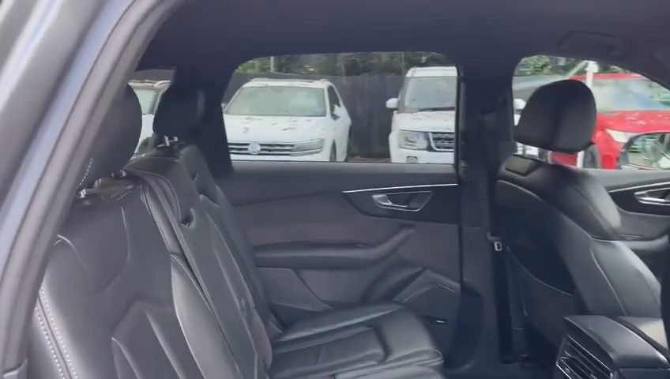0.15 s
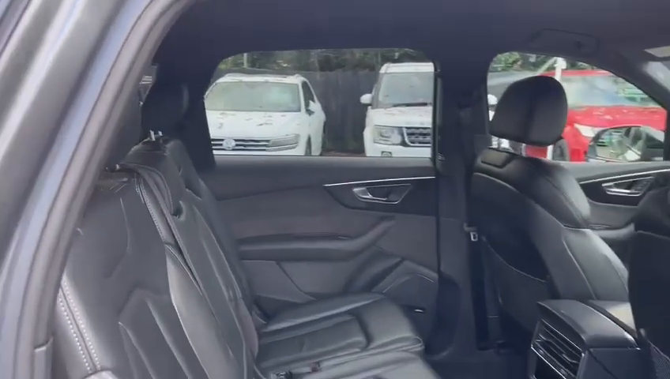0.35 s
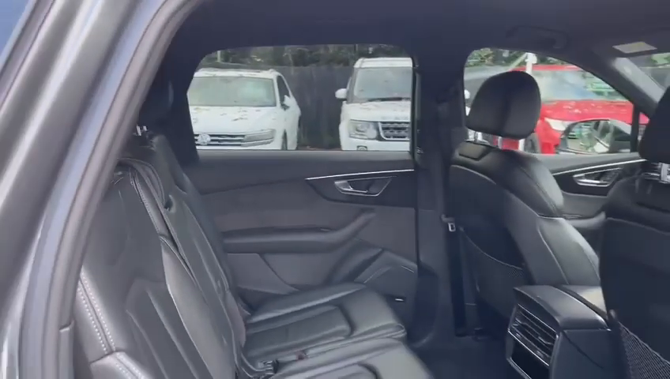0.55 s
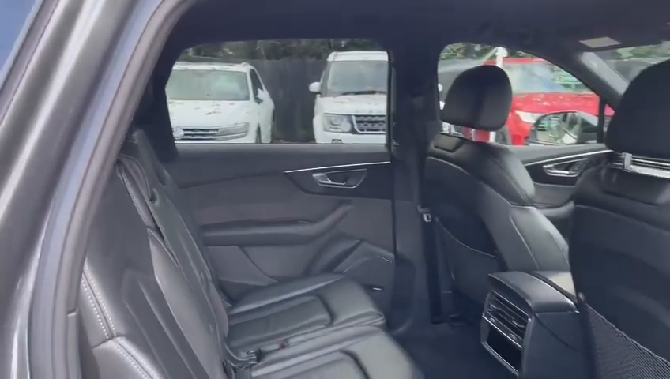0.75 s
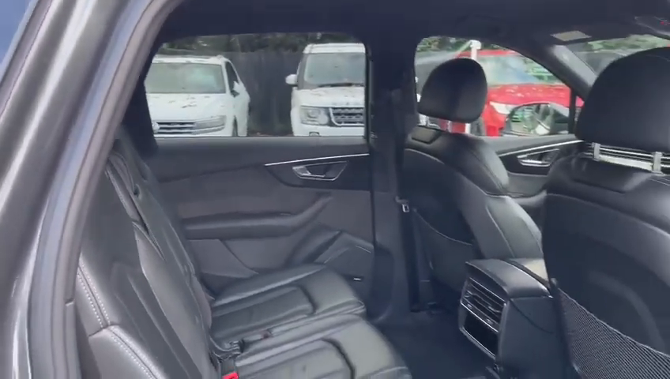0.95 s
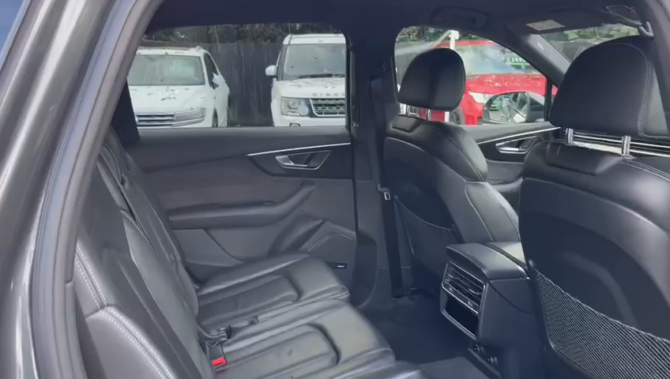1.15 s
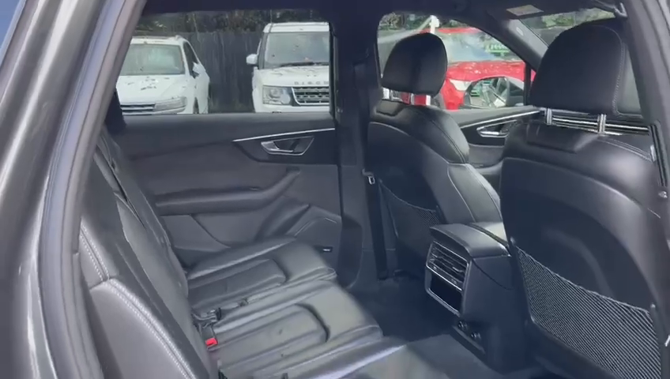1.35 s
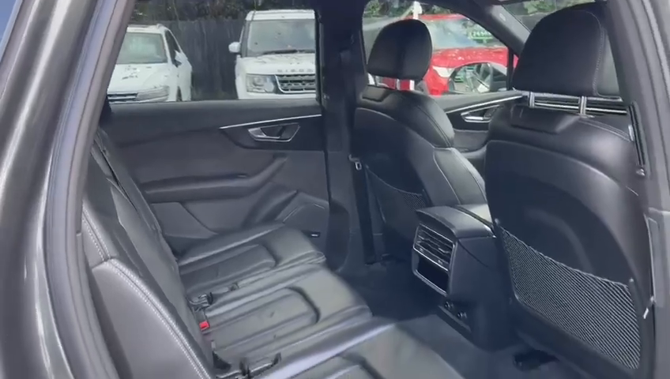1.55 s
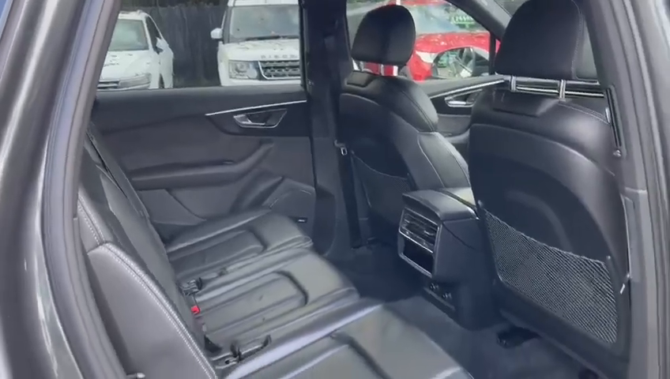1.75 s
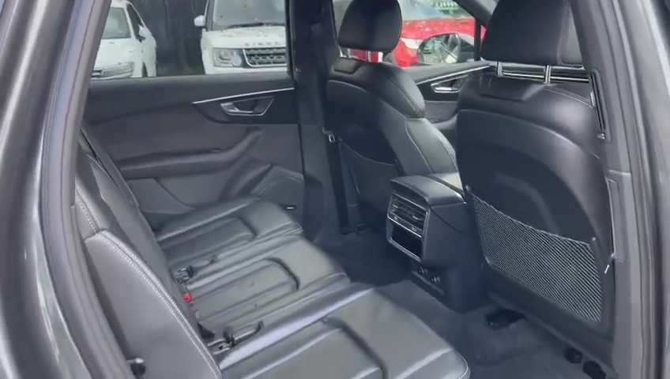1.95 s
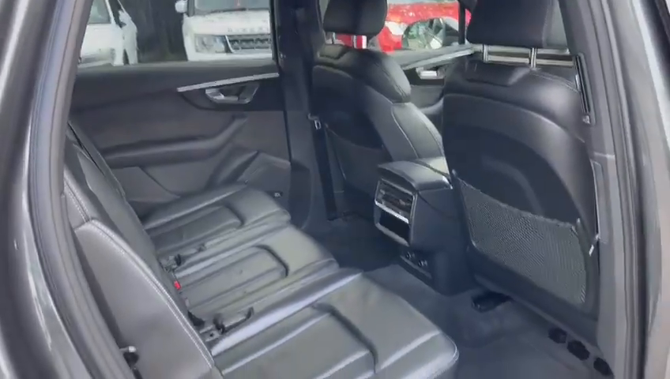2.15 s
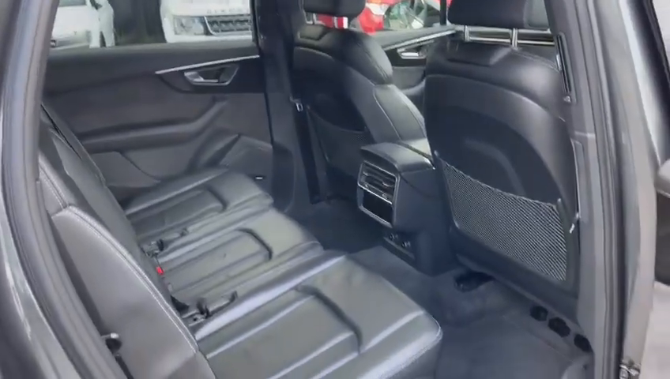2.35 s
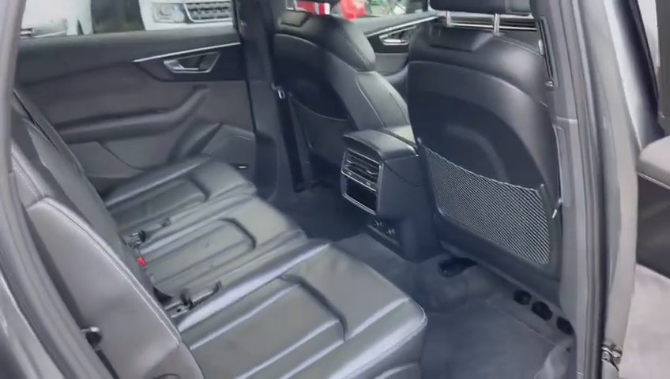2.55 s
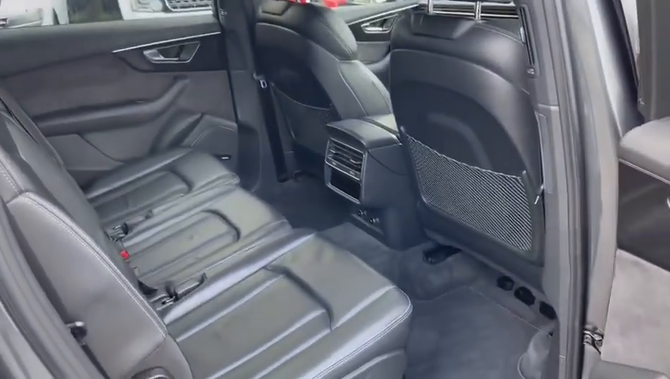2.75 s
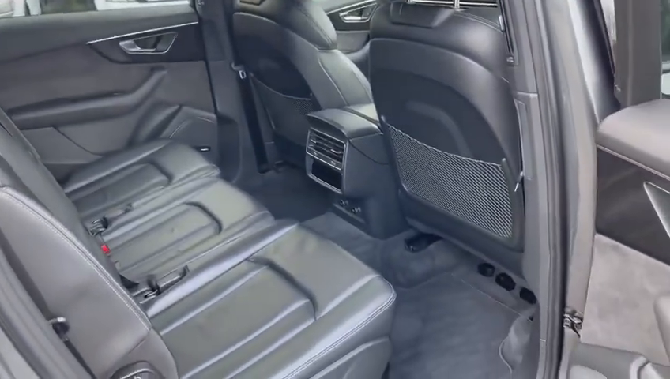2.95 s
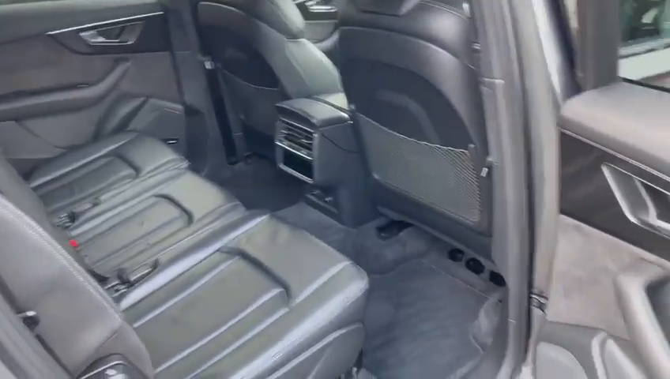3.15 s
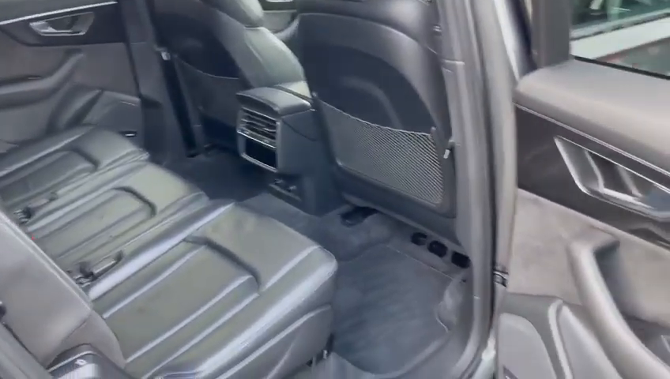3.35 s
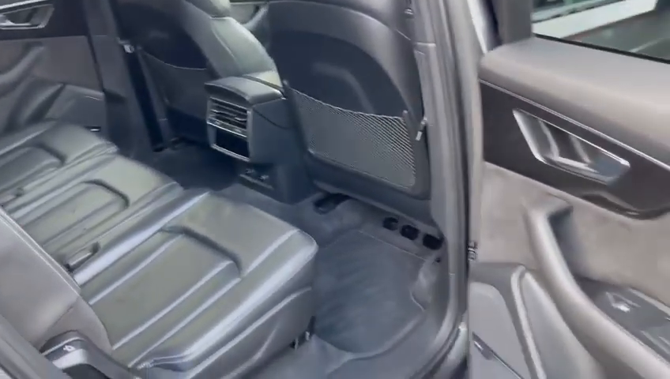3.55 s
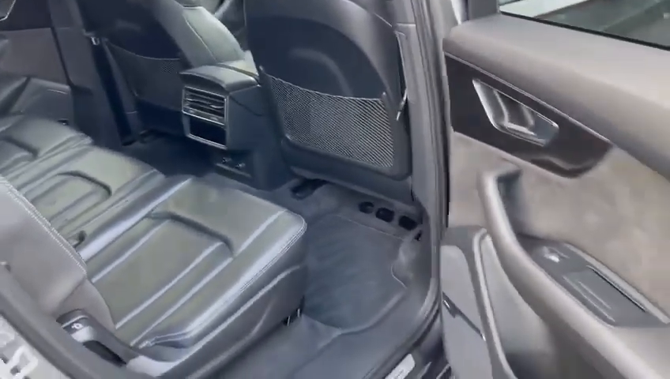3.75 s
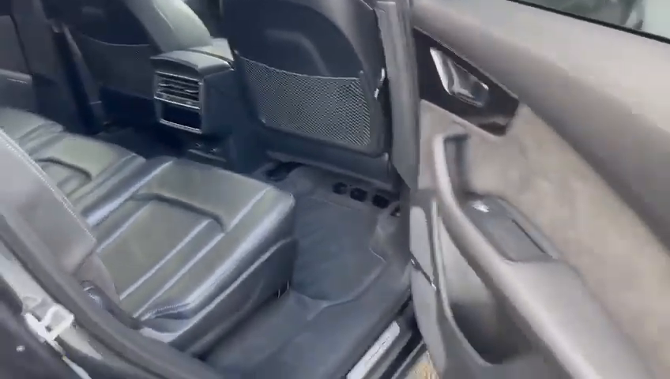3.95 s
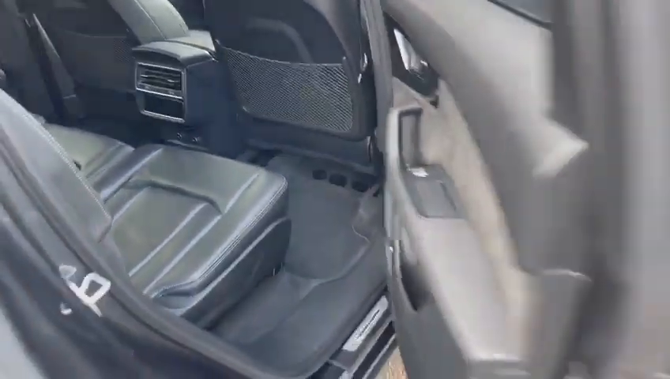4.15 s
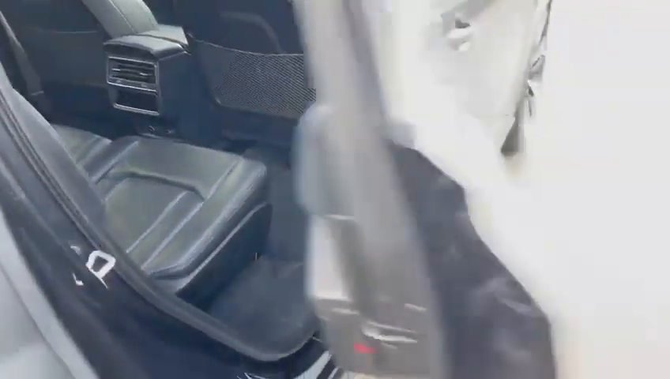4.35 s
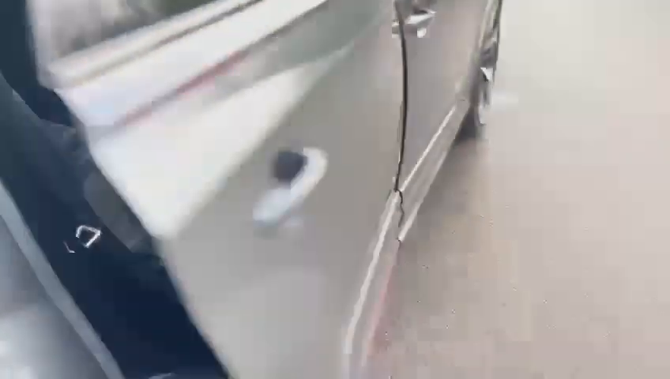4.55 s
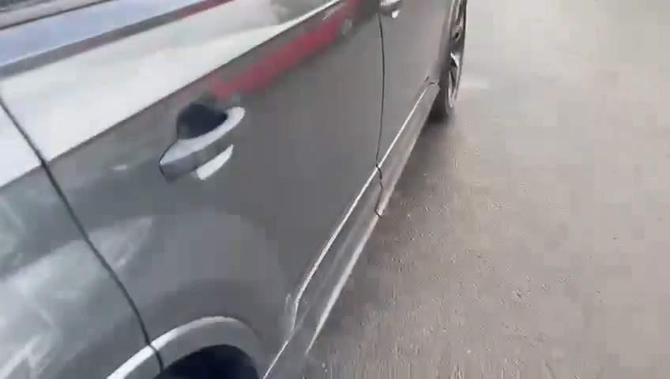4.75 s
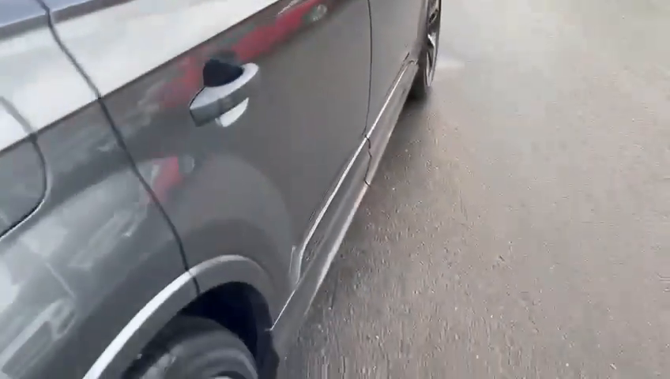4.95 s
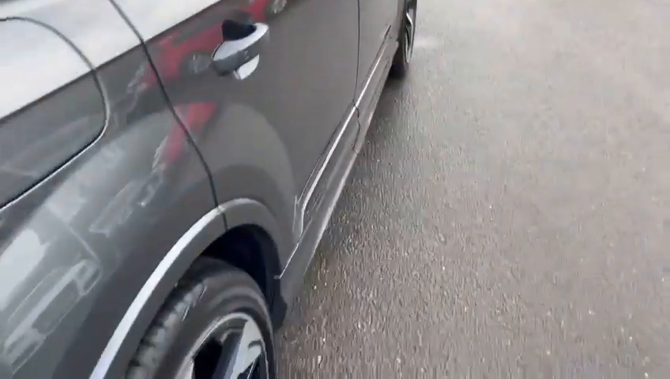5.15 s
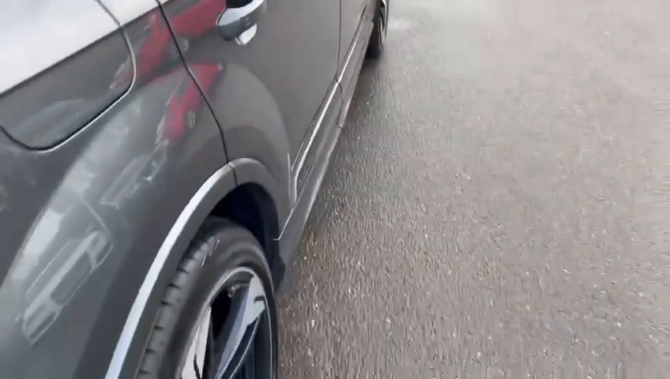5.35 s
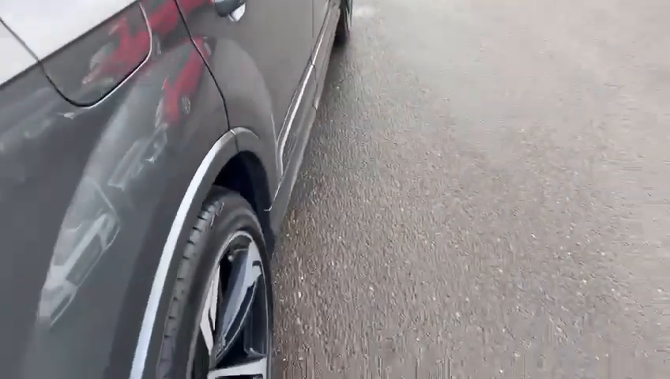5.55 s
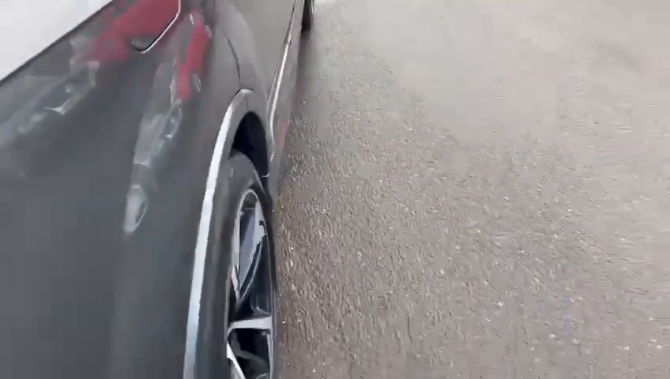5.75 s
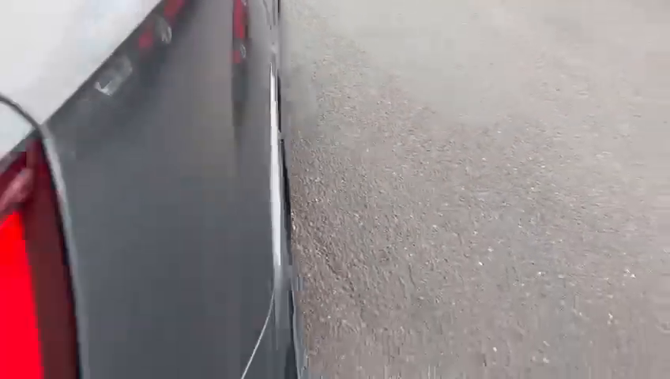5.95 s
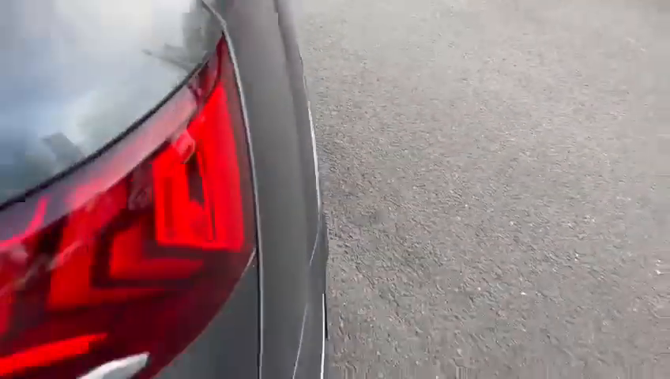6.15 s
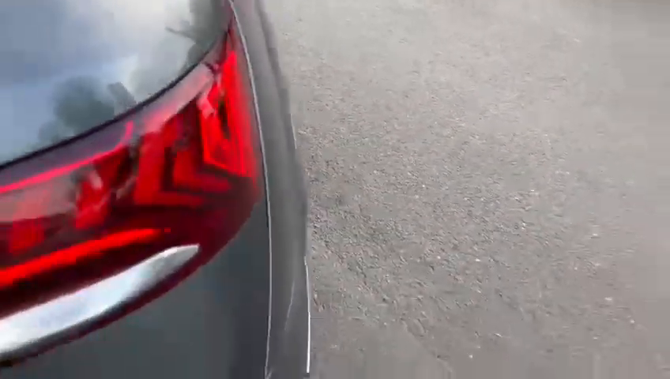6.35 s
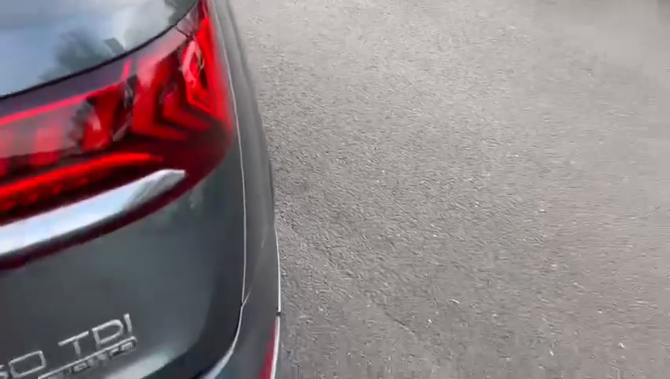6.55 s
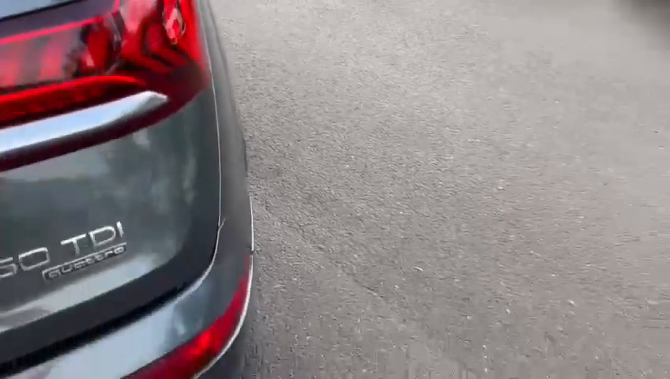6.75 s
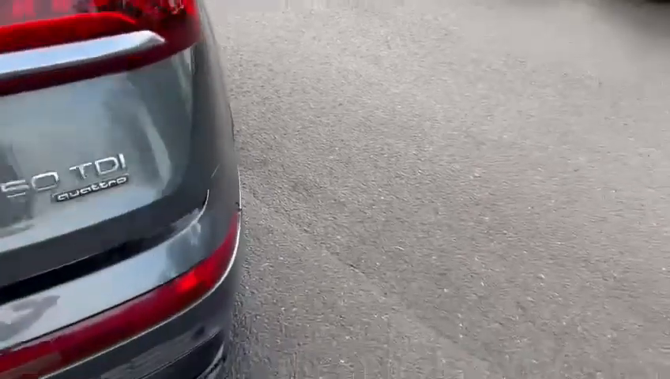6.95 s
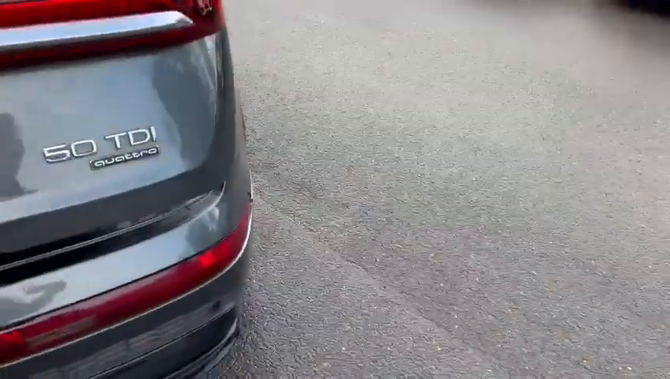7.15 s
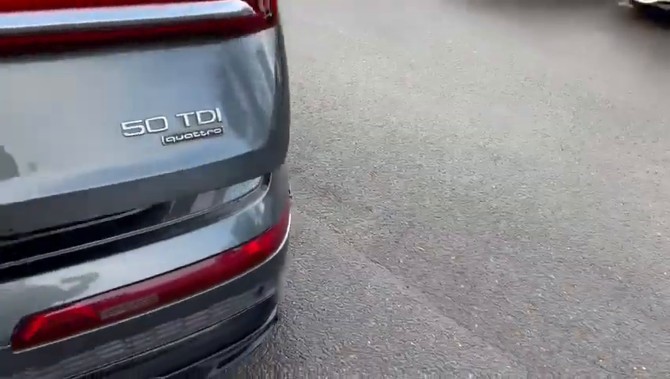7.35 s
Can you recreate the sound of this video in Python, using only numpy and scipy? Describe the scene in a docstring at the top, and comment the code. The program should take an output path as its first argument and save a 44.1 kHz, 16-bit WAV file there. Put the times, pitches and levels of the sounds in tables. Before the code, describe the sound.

A close handheld stereo microphone in the open air among parked cars. Quiet traffic drone and cloth rustle come first, with a passing vehicle and a thin, squeaky whine. Past the middle, a car door shuts with a sharp latch crack and a deep boom, answered by very short reflections from nearby cars. Brushes and clicks lead to a weaker, harder thud, then small irregular knocks over the traffic.

```python
"""Car door slam beside a road

Far traffic rumbles, drones and roars as shaped noise; a vehicle passes, and a faint high squeal rings out.
Close by, clothes rustle as grainy noise and small parts tick and knock as short bursts and rings.
A heavy car door slams, then a second, brighter thud falls further left: blows push banks of ringing modes,
panels and trim rattle through both, and neighbouring cars send back short echoes."""
import sys
import numpy as np
from scipy import signal
from scipy.fft import rfft, irfft, next_fast_len
from scipy.io import wavfile

SR = 44100
rng = np.random.default_rng(int(sys.argv[2]) if len(sys.argv) > 2 else 0)


def dump(signal):
    """Clip the signal to [-1, 1] and save it as 16-bit WAV at the path in sys.argv[1]."""
    limited = np.clip(np.atleast_2d(signal).T, -1, 1)
    pcm = np.round(limited * 32767).astype(np.int16)
    wavfile.write(sys.argv[1], SR, pcm)


N = 327118   # length in samples


def from_db(db):
    """Turns dB into an amplitude factor."""
    return 10 ** (np.asarray(db) / 20)


def rms_one(x):
    """Scales a sound to rms 1."""
    return x / np.sqrt(np.mean(x ** 2) + 1e-20)


def in_time(rows):
    """Draws straight lines between timed rows, one curve for each column after the time."""
    seconds, *columns = np.transpose(rows)
    return [np.interp(np.arange(N) / SR, seconds, column) for column in columns]


def at_hz(points, hz):
    """Reads a curve of (Hz, value) points on a logarithmic frequency axis."""
    point_hz, values = np.array(points).T
    return np.interp(np.log(hz), np.log(point_hz), values)


def drift(rate_hz):
    """Slow random wander of spread 1: noise through two equal low-pass poles at rate_hz."""
    step = 40   # samples between the points of the wander
    pole = np.exp(-2 * np.pi * rate_hz * step / SR)
    noise = rng.standard_normal(N // step + 2002)
    slow = signal.lfilter([1], [1, -2 * pole, pole * pole], noise)[2000:]   # settled part only
    return np.interp(np.arange(N) / step, np.arange(len(slow)), rms_one(slow))


def band(sound, low_hz, high_hz, order=2):
    """Keeps a band of frequencies."""
    edges = [low_hz, high_hz]
    return signal.sosfilt(signal.butter(order, edges, "band", fs=SR, output="sos"), sound)


def ring(push, hz, t60):
    """A damped resonance: a unit click sets a sine of height 1 ringing, 60 dB down after t60 seconds."""
    pole, turn = from_db(-60 / (t60 * SR)), 2 * np.pi * hz / SR
    # the tiny offset keeps the filter clear of very slow, vanishing numbers
    return signal.lfilter([0, np.sin(turn)], [1, -2 * pole * np.cos(turn), pole * pole], push + 1e-18)


# How alike left and right are in the open air. Each row: frequency in Hz, likeness from 0 to 1.
LEFT_RIGHT_LIKENESS = [(60, 1), (160, 0.92), (450, 0.38), (1220, 0.07), (3340, 0.36), (9110, 0.65)]


def coloured(spectrum, source, length=N):
    """Shapes two noises to a spectrum and mixes them to the open-air left-right likeness; rms 1."""
    size = next_fast_len(length)
    hz = np.maximum(np.fft.rfftfreq(size, 1 / SR), 10)
    low_hz, high_hz = spectrum[0][0], spectrum[-1][0]
    gain = from_db(at_hz(spectrum, hz))
    gain = gain * np.minimum(hz / low_hz, 1) ** 4 * np.minimum(high_hz / hz, 1) ** 4   # steep outer slopes
    alike = np.clip(at_hz(LEFT_RIGHT_LIKENESS, hz), 0, .995)
    mid, side = rfft(source, size)
    stereo = np.sqrt(1 + alike) * mid + np.sqrt(1 - alike) * side * [[1], [-1]]
    return rms_one(irfft(gain * stereo, size)[:, :length])


# Spectra of the far rumble, the drone and the tyre roar. Each row: frequency in Hz, density in dB per Hz.
RUMBLE_SPECTRUM = [(20, -52), (39, -11), (59, 1.5), (96, -8), (200, -21.5), (260, -67)]
DRONE_SPECTRUM = [(65, -44), (110, 1), (232, -2), (351, -5.5), (397, -8.5), (508, -5.5), (673, -6.5),
                  (900, -5.5), (1170, -15), (1980, -120)]
TYRE_SPECTRUM = [(290, -8), (500, -9), (759, -7.5), (827, -2.5), (1100, -2), (2130, -14), (3610, -26),
                 (9400, -32.5)]
# Traffic layers: rumble, drone, tyre roar. Each row: far level in dB before its swell, level of the passing
# vehicle at its nearest in dB before random swelling, spread of the random swell in dB.
TRAFFIC_LAYERS = [(-40, -54, -0.5), (-55.5, -38, 1.5), (-53, -45.5, 1.36)]
# Swelling and sinking of the far traffic. Each row: time in seconds, rumble in dB, drone and tyres in dB.
FAR_SWELL = [(0, -5.5, -0.7), (1.1, -2, 5), (2.5, -3, 5.5), (2.8, 0.5, 6), (3.55, -3, 2.5), (4.7, -1, 6),
             (5.2, -1.8, 3.5), (6.4, -3.5, -1), (6.86, -2, 5.5), (7.07, -1, -2), (7.13, -17, 1),
             (7.21, -8, -0.5), (7.26, -2, 0.5), (7.42, -1, 1)]
PASS_S, PASS_M, PASS_M_PER_S = 1.847, 7.9, 16.7   # nearest moment, nearest distance, speed
CLEAR_S, CLEAR_OVER_S, SCREEN_DB = 1.45, .03, -5.5   # parked cars screen the vehicle until it comes clear
GROUND_ECHO_S, GROUND_ECHO_DB = 0.003715, -8   # the road surface mirrors the passing vehicle


def traffic():
    """Three smooth noises, far off, swelling and sinking; a passing vehicle fades with distance squared."""
    t = np.arange(N) / SR
    nearness = PASS_M / np.hypot(PASS_M, PASS_M_PER_S * (t - PASS_S))
    screen = from_db(SCREEN_DB * (1 - np.tanh((t - CLEAR_S) / CLEAR_OVER_S)) / 2)
    low_db, mid_db = in_time(FAR_SWELL)
    swells = (low_db, mid_db, mid_db)
    spectra = (RUMBLE_SPECTRUM, DRONE_SPECTRUM, TYRE_SPECTRUM)
    out = 0
    for (far_db, near_db, patchy_db), swell_db, spectrum in zip(TRAFFIC_LAYERS, swells, spectra):
        far = coloured(spectrum, rng.standard_normal((2, N)))
        vehicle = np.roll(far, N // 2, axis=1)   # same noise, shifted by half the scene
        ground_echo = np.roll(vehicle, round(GROUND_ECHO_S * SR), axis=1)
        vehicle = rms_one(vehicle + from_db(GROUND_ECHO_DB) * ground_echo)
        passing = from_db(near_db + 1.4 * drift(7.4)) * nearness ** 2 * screen
        random_swell = from_db(patchy_db * drift(3.84))
        out = out + random_swell * (from_db(far_db + swell_db) * far + passing * vehicle)
    return out


# A faint squeal, sinking in pitch after a first small rise. Each row: time in seconds, level in dB, pitch in Hz.
SQUEAL = [(1.7, -83, 6050), (1.775, -48.5, 6120), (1.86, -73, 6250), (2.06, -59, 6020), (2.22, -75, 5970),
          (2.34, -58, 5960), (2.5, -65.5, 5930), (2.62, -85, 5880)]
UNDER_SHARE, UNDER_DB, UNDER_FROM_S = .835, -7, 1.92   # second band: share of the pitch, level, start


def squeal():
    """A faint squeal, perhaps brakes: two tones blurred by fast random swelling, the lower one joining late."""
    level_db, hz = in_time(SQUEAL)
    phase = 2 * np.pi * np.cumsum(hz) / SR
    joined = np.arange(N) / SR > UNDER_FROM_S
    under = from_db(UNDER_DB) * joined * drift(200) * np.sin(UNDER_SHARE * phase)
    main = (1 + 0.43 * drift(60)) * np.sin(phase + drift(120))
    return from_db(level_db) * (main + under)


def grains(length, hz):
    """Dense, uneven grains in a broad band around hz; rms 1."""
    noise = rng.standard_normal((2, length)) * [[1], [.5]]   # the side is half the middle
    grain_db = 6 * np.minimum(rng.exponential(1, length), 4)
    mid, side = band(noise * from_db(grain_db), hz / 2.57, min(hz * 2.37, .45 * SR))
    return rms_one(mid + side * [[1], [-1]])


# Rustle of clothes as the person moves. Each row: time in seconds, level in dB before random swelling.
MOVING = [(0, -62.5), (.5, -71.5), (.85, -57.5), (1.05, -70), (1.35, -52.5), (1.9, -63), (2.8, -71),
          (3.0, -59), (3.3, -69), (3.7, -57.5), (4.05, -54.5), (4.35, -63), (4.6, -52.5), (4.85, -51),
          (5.2, -58), (5.4, -59), (6.1, -62.5), (6.3, -54.5), (6.9, -57.5), (7.42, -60)]
# Single brushes of cloth, shoes and hands. Each row: start in seconds, length in seconds,
# level in dB before random swelling, centre in Hz.
BRUSHES = [(0.645, 0.16, -57, 6500), (1.297, 0.4, -53, 4900), (3.816, 0.059, -51, 4920),
           (3.864, 0.15, -48, 6240), (4.819, 0.15, -44.5, 5300), (5.422, 0.24, -55.5, 6400),
           (5.76, 0.12, -53, 2700), (5.832, 0.16, -51.5, 6150), (5.95, 0.076, -49, 3700),
           (6.624, 0.032, -49, 6500), (6.675, 0.061, -55, 7540), (6.746, 0.029, -41.5, 1450),
           (6.754, 0.15, -45.5, 7360), (6.913, 0.14, -50, 7000), (6.959, 0.16, -42, 220)]
RUSTLE_HZ, RUSTLE_PATCHY_DB = 9450, 1.5


def clothes():
    """An uneven rustle of grains follows the movement; each brush is a swell around its own centre."""
    moving_db, = in_time(MOVING)
    out = from_db(moving_db + RUSTLE_PATCHY_DB * drift(20)) * grains(N, RUSTLE_HZ)
    for start_s, length_s, level_db, hz in BRUSHES:
        at, length = round(start_s * SR), round(length_s * SR)
        swell = np.sin(np.linspace(0, np.pi, length)) ** 0.8
        out[:, at:at + length] += from_db(level_db) * swell * grains(SR // 2, hz)[:, :length]
    return out * from_db(1.6 * drift(22))


def place_hit(out, s, peak_db, hit, pan_db):
    """Lays one hit into the scene at a peak level, the left louder than the right by pan_db."""
    at = round(s * SR)
    hit = (hit / np.abs(hit).max())[:N - at]
    sides = from_db(peak_db + np.array([[pan_db], [-pan_db]]) / 2)
    out[:, at:at + len(hit)] += sides * hit


# Sharp ticks of latch, trim and handled things. Each row: start in seconds, peak in dB before panning,
# centre in Hz, relative width, time to fall 60 dB in seconds.
TICKS = [(0.5183, -43, 4970, 0.71, 0.0074), (0.924, -33.5, 7730, 0.44, 0.0059),
         (0.9947, -45, 6040, .8, 0.0086), (1.366, -45, 3500, 0.27, .01), (1.481, -44, 5000, 1.3, 0.011),
         (1.5165, -39.5, 3970, .3, 0.018), (1.536, -42, 2780, 0.091, 0.016), (1.578, -36, 5000, 1.1, 0.011),
         (2.9367, -37.5, 6950, 0.53, 0.036), (3.5344, -44.5, 4200, 0.61, .008),
         (3.6273, -41, 8350, 0.17, 0.042), (3.805, -41, 8300, 0.063, 0.022),
         (4.6742, -3.5, 7900, 0.28, 0.017), (4.6758, -5, 7600, 0.13, 0.0092),
         (4.7124, -26, 7050, 0.44, 0.013), (4.8345, -18, 2200, 2.7, 0.007),
         (4.8742, -18, 2260, 0.86, 0.011), (4.896, -27, 3570, 1, 0.012), (4.932, -27, 5760, 0.063, 0.01),
         (4.9313, -32, 8440, 0.087, .012), (5.0444, -30.5, 5960, 2, .025), (5.5898, -39, 2320, 1.3, 0.022),
         (5.82, -35.5, 7340, 0.17, 0.013), (5.9877, -35.5, 2340, 0.76, 0.07),
         (6.263, -51, 3060, 0.036, 0.093), (6.3979, -13.5, 2500, 1.5, 0.027),
         (6.4002, -12, 8900, 0.14, 0.02), (6.4444, -31, 8900, 0.25, 0.013), (6.542, -47, 2500, 0.2, .02),
         (6.6345, -36, 8600, 0.11, 0.018), (6.697, -38, 8040, 0.14, 0.03), (6.705, -33, 4380, 1.4, 0.021),
         (6.749, -28, 2000, 0.16, 0.026), (6.782, -36, 4430, 0.077, 0.014), (6.872, -38, 8040, 0.23, .01),
         (6.9536, -33.5, 4500, 0.48, 0.033), (7.058, -35, 5000, 1.4, 0.0087),
         (7.076, -42, 2270, 0.21, 0.041), (7.283, -31.5, 3530, 6.5, 0.041), (7.3684, -39, 6130, 0.72, .016)]


def ticks():
    """Each tick is a burst of dying noise, kept to a band around its centre."""
    out, t = np.zeros((2, N)), np.arange(round(.2 * SR)) / SR
    for s, peak_db, hz, width, t60 in TICKS:
        attack = np.minimum(t / 0.0005, 1)
        burst = rng.standard_normal(len(t)) * from_db(-60 * t / t60) * attack
        tick = band(burst, hz / (1 + width), min(hz * (1 + width), .45 * SR))
        place_hit(out, s, peak_db, tick, pan_db=2.4)
    return out


# Dull knocks and steps. Each row: start in seconds, peak in dB before panning, pitch in Hz,
# time to fall 60 dB in seconds, left over right in dB.
KNOCKS = [(0.926, -27.5, 663, 0.017, 1), (4.173, -28.5, 84, 0.061, 0), (4.651, -25, 544, 0.073, 4),
          (4.657, -32, 1410, 0.048, 10), (5.259, -25.5, 72, 0.031, 5), (5.945, -30, 239, 0.11, 10),
          (6.353, -37, 1006, 0.03, 24), (6.653, -26, 62.7, 0.09, -1), (6.709, -24.5, 643, 0.018, -9),
          (6.753, -29.5, 780, 0.037, 13), (6.999, -30, 619, 0.073, 8), (7.006, -29.5, 236, 0.019, 10),
          (7.036, -38, 624, 0.049, 5), (7.06, -31, 195, 0.13, 11), (7.06, -34, 655, 0.032, 3),
          (7.1, -32, 637, 0.017, 4), (7.136, -38, 670, 0.039, 0), (7.166, -34.5, 655, 0.011, -2),
          (7.203, -35, 650, 0.025, 3), (7.37, -34, 580, 0.013, -6)]
CRACK_T60_S = 0.0071   # the thin crack at the start of each knock


def knocks():
    """Each knock is one resonance struck softly and a little roughly, with a thin noise crack at its start."""
    out, t = np.zeros((2, N)), np.arange(round(.2 * SR)) / SR
    for s, peak_db, hz, t60, pan_db in KNOCKS:
        contact = (1 + 0.6 * rng.standard_normal(len(t))) * t * np.exp(-t * hz * 5.0)
        scrape = 0.034 * contact * rng.standard_normal(len(t))
        push = np.diff(contact, prepend=0) + scrape
        place_hit(out, s, peak_db, ring(push, hz, t60), pan_db)
        crack = rng.standard_normal(len(t)) * from_db(-60 * t / CRACK_T60_S)
        crack_db = -7 if hz > 500 else -14   # against the knock; weaker on deep ones
        place_hit(out, s, peak_db + crack_db, crack, pan_db)
    return out


# Panel noise spectra of the door and of the second thud. Each row: frequency in Hz, density in dB per Hz.
DOOR_PANEL = [(180, -29), (300, -14), (1490, -26.5), (2920, -37), (9400, -36.5)]
THUD_PANEL = [(180, -29), (300, -8), (626, -3), (2000, -13.5), (4910, -27.5), (9400, -24)]
# Panels and trim rattling through each slam. Each row: first touch in seconds, brushing in dB before it is
# dulled, slam in seconds, rattle in dB before its lumps, hold in seconds, fall in dB per second.
SLAMS = [(4.65, -33.5, 4.666, -18, 0.017, 490), (6.351, -38, 6.397, -13.5, 0.002, 661)]
RATTLE_ATTACK_S, RATTLE_UNEVEN_DB = 0.002, 0.5   # the rattle comes in lumps
BRUSHING_CUT_HZ = 4700   # the first touch is dull


def rattle():
    """Panel noise under each slam: light brushing from the first touch, then attack, hold and fall."""
    out, t = np.zeros((2, N)), np.arange(SR // 4) / SR
    low_pass = signal.butter(2, BRUSHING_CUT_HZ, fs=SR, output="sos")
    for (touch_s, brush_db, slam_s, slam_db, hold_s, fall), spectrum in zip(SLAMS, (DOOR_PANEL, THUD_PANEL)):
        since = t - (slam_s - touch_s)   # seconds since the slam
        attack = np.clip(1 + since / RATTLE_ATTACK_S, 0, 1) ** 2
        dying = from_db(-fall * np.maximum(since - hold_s, 0))
        lumps_db = RATTLE_UNEVEN_DB * drift(260)[:len(t)]
        envelope = from_db(slam_db + lumps_db) * attack * dying
        noise = rng.standard_normal((2, len(t))) * [[1], [.7]]
        panel = coloured(spectrum, noise, length=len(t))
        brushing = from_db(brush_db) * (since < 0) * signal.sosfilt(low_pass, panel)
        at = round(touch_s * SR)
        out[:, at:at + len(t)] += brushing + envelope * panel
    return out


FULL_PAN_HZ = 244   # deeper modes sit nearer the middle
LIGHT_TOUCH = 0.17   # a contact hardly moves the modes below this share of its brightness


def struck_body(blows, modes, shudder_db, shudder_s, pan_db):
    """Each blow pushes all the modes, longer for soft contacts; loose parts shudder on after it as noise."""
    push, t = np.zeros(N), np.arange(round(.2 * SR)) / SR
    for s, blow_db, bright_hz in blows:
        pulse = t * np.exp(-2 * np.pi * bright_hz * t)
        shudder = from_db(shudder_db - 60 * t / shudder_s) * rng.standard_normal(len(t))
        high_pass = signal.butter(1, LIGHT_TOUCH * bright_hz, "high", fs=SR)
        blow = signal.lfilter(*high_pass, pulse / pulse.sum() + shudder)
        at = round(s * SR)
        push[at:at + len(t)] += from_db(blow_db) * blow
    out = np.zeros((2, N))
    for k, (hz, db, t60) in enumerate(modes):
        half_pan_db = pan_db / 2 * min(hz / FULL_PAN_HZ, 1)
        sides = from_db(db + half_pan_db * np.array([[1], [-1]]))
        out += (-1) ** k * sides * ring(push, hz, t60)   # neighbouring modes ring in opposite sign
    return out


# Contacts of the second thud. Each row: time in seconds, blow in dB, contact brightness in Hz.
THUD_BLOWS = [(6.3968, -17, 2010), (6.3981, -19, 1530), (6.4015, -7.5, 450), (6.4151, -22.5, 217),
              (6.4342, -32, 280), (6.536, -32, 260), (6.551, -30, 303), (6.636, -31, 306)]
# Modes of what the second thud strikes. Each row: frequency in Hz, level in dB before panning,
# time to fall 60 dB in seconds.
THUD_MODES = [(57.6, -3, 0.3), (99, 1, 0.12), (138, -1, 0.17), (184.4, -11, 0.29), (211, -10.5, 0.21),
              (302, -2.5, 0.11), (373, -10.5, 0.13), (509, 9.5, 0.038), (594, 7.5, 0.019),
              (796, 5.5, 0.016), (1008, -10, 0.052), (1440, -17, 0.068), (1870, -20, 0.04),
              (2700, -25, 0.1)]


def second_thud():
    """A brighter struck body, further left, whose blows set its modes ringing."""
    return struck_body(THUD_BLOWS, THUD_MODES, shudder_db=-42.5, shudder_s=0.23, pan_db=4.5)


# Contacts of the door with its frame, from seal to rebound. Each row: time in seconds, blow in dB,
# contact brightness in Hz.
DOOR_BLOWS = [(4.6646, -17.5, 1180), (4.6688, -17.5, 805), (4.6725, -9, 804), (4.6767, -4.5, 302),
              (4.6865, -15.5, 131), (4.6966, -19.5, 520), (4.719, -19.5, 140), (4.812, -30.5, 500),
              (4.826, -25, 110)]
# Modes of the door. Each row: frequency in Hz, level in dB before panning, time to fall 60 dB in seconds.
DOOR_MODES = [(49, -7, .1), (65, 1, 0.32), (101, 16.5, 0.041), (137, -1, 0.1), (172.6, -3, 0.067),
              (182, 1.5, 0.075), (200, -4, 0.14), (262, 4.5, 0.059), (330, 4.5, 0.077), (420, -7.5, 0.074),
              (527, 4, 0.084), (607, -2.5, 0.052), (739, -5.5, 0.078), (1470, -34, 0.075)]


def car_door():
    """The heavy door meets its frame in a chain of blows that set its mostly low modes ringing."""
    return struck_body(DOOR_BLOWS, DOOR_MODES, shudder_db=-44.5, shudder_s=0.15, pan_db=2.5)


def car_echoes(close):
    """Neighbouring cars send back short echoes of the middle range, different ones to each side."""
    middle = band(close.mean(0), 300, 2500, order=1)
    left = [(.003, -5.5), (.023, -13.5)]   # delay in seconds, level in dB
    right = [(.005, -6.5), (.031, -32)]
    return np.array([sum(from_db(db) * np.roll(middle, round(s * SR)) for s, db in side)
                     for side in (left, right)])


def scene():
    """Lays the close hits and their echoes over the traffic, the squeal and the clothes."""
    background = traffic() + squeal() + clothes()
    close = ticks() + knocks() + rattle() + second_thud() + car_door()
    close[1] = np.roll(close[1], 1)   # near sounds reach the left side one sample sooner
    return background + close + car_echoes(close)


BASS_CUT_HZ, CUTOFF_HZ = 40, 9350
CEILING, HARDNESS = 0.83, 3.7   # peaks bend toward the ceiling; a higher hardness bends them later


def record(dry):
    """The deepest bass is lost, peaks are rounded, the top is cut."""
    heard = signal.sosfilt(signal.butter(1, BASS_CUT_HZ, "high", fs=SR, output="sos"), dry)
    rounded = heard / (1 + np.abs(heard / CEILING) ** HARDNESS) ** (1 / HARDNESS)
    top_cut = signal.ellip(10, .5, 60, CUTOFF_HZ, fs=SR, output="sos")
    return signal.sosfilt(top_cut, rounded)


dry = scene()
out = record(dry)
dump(out)
```